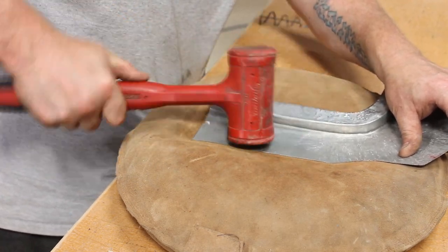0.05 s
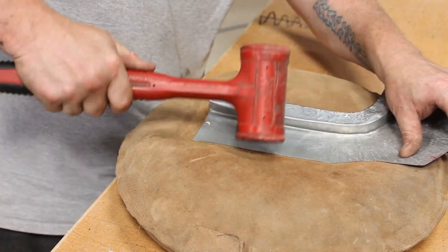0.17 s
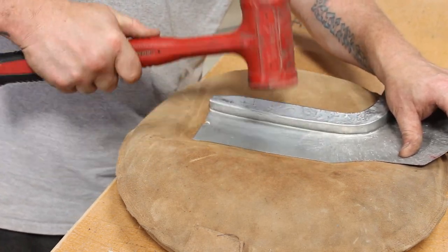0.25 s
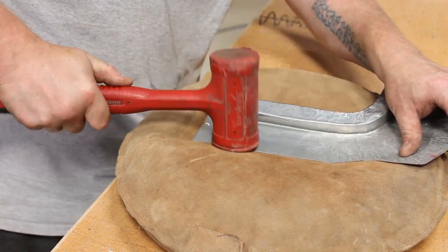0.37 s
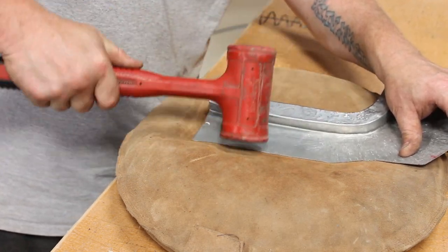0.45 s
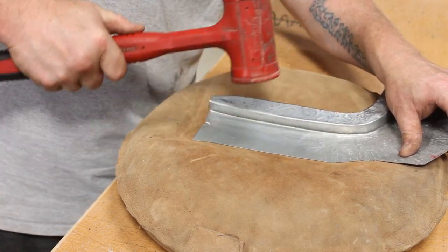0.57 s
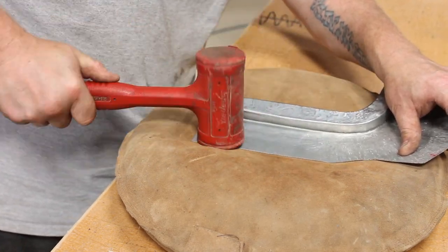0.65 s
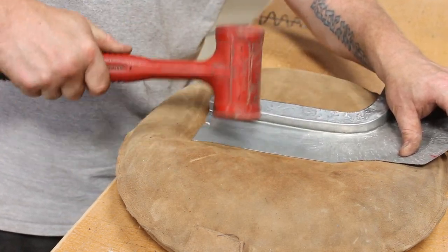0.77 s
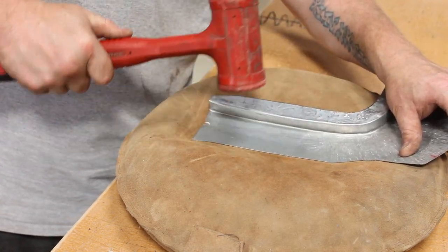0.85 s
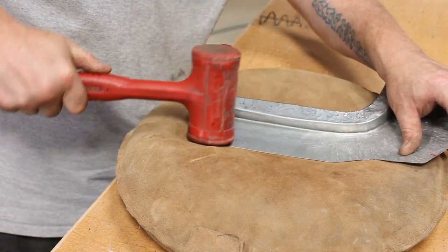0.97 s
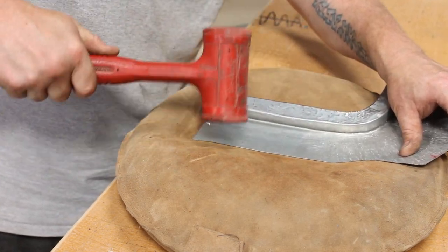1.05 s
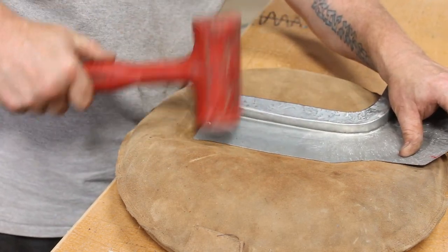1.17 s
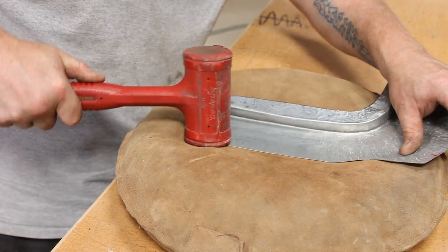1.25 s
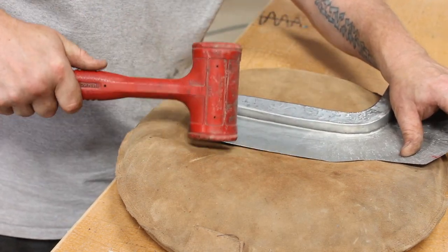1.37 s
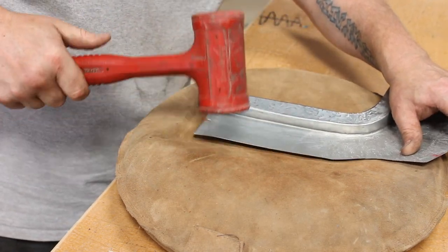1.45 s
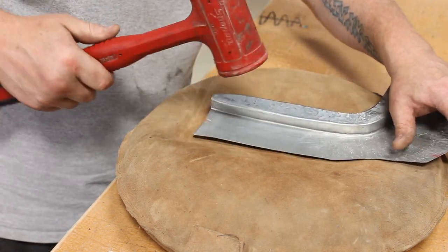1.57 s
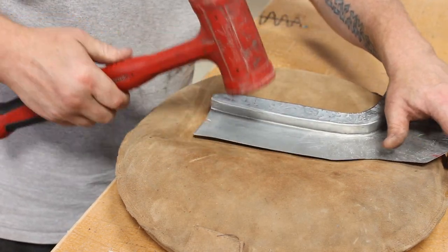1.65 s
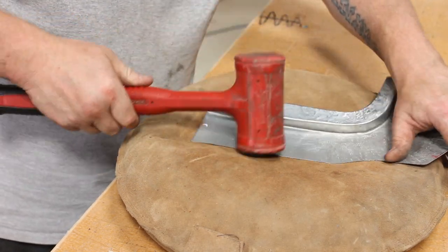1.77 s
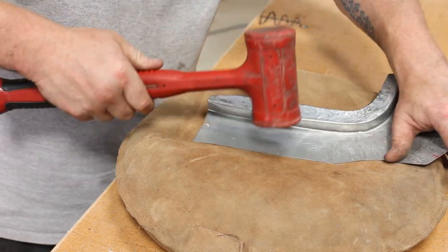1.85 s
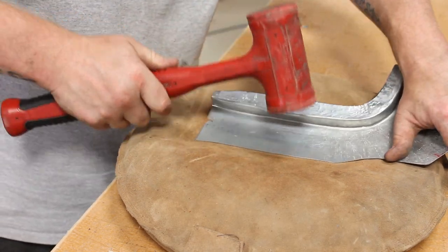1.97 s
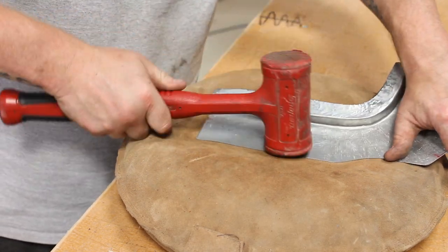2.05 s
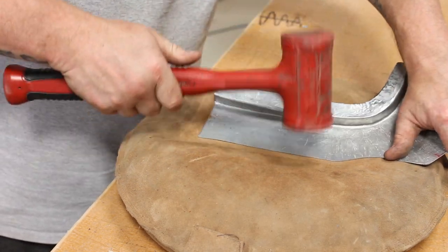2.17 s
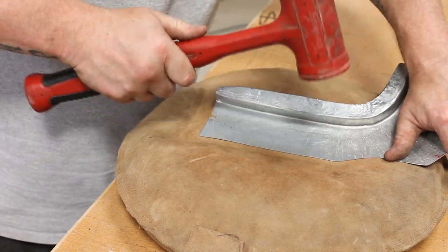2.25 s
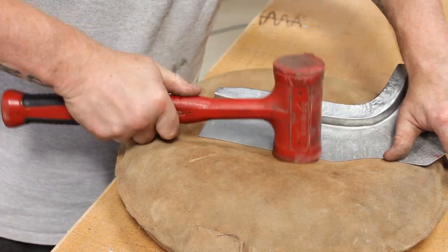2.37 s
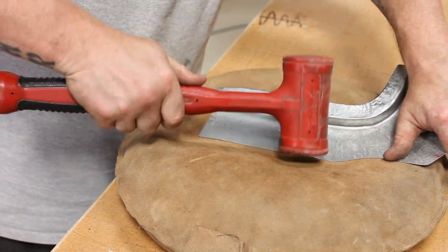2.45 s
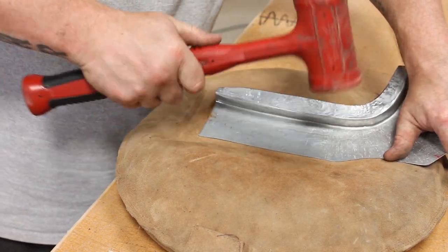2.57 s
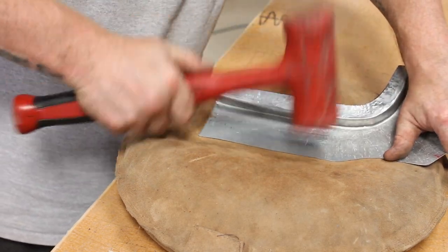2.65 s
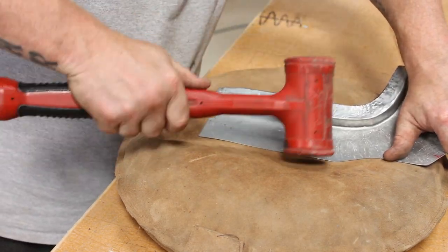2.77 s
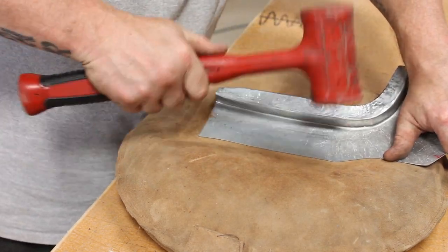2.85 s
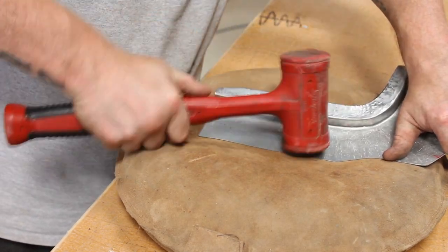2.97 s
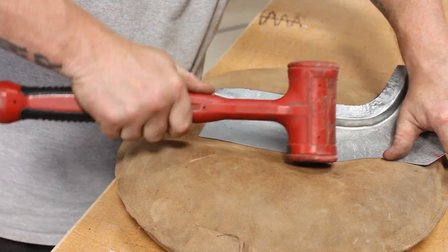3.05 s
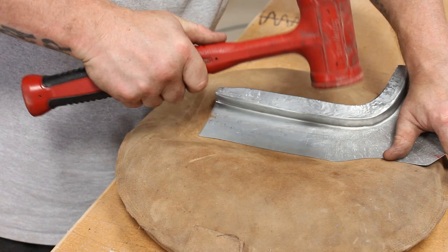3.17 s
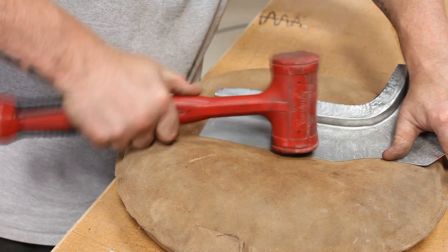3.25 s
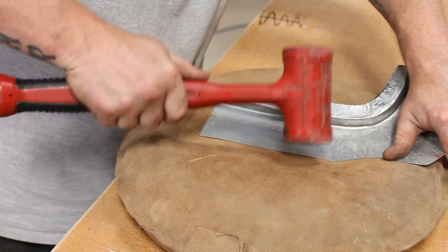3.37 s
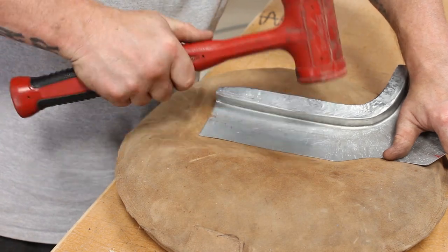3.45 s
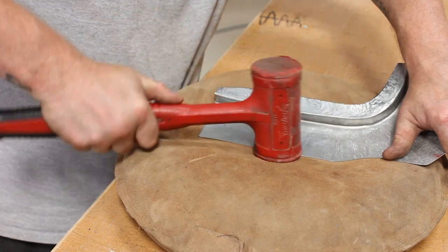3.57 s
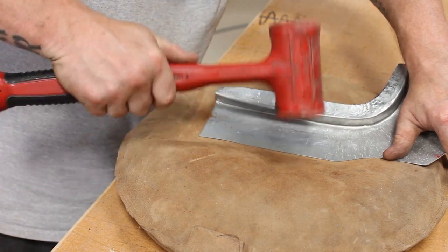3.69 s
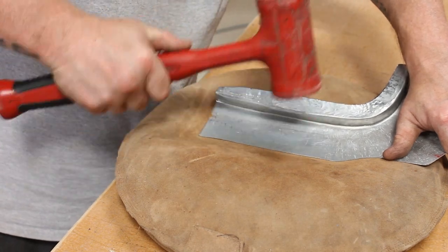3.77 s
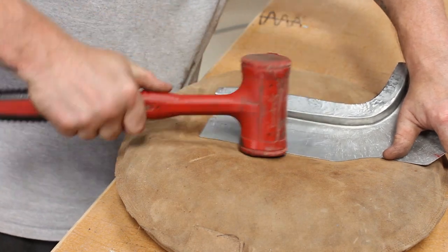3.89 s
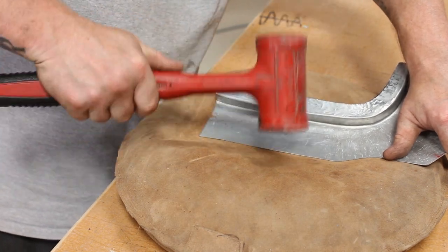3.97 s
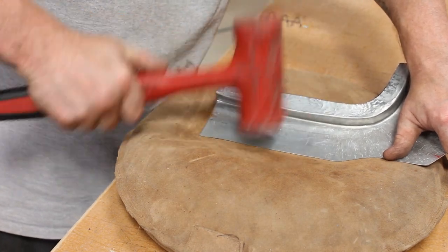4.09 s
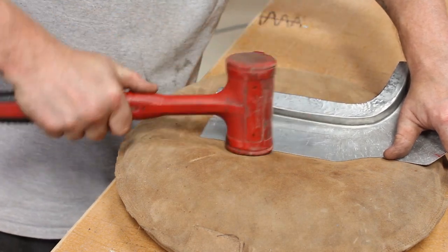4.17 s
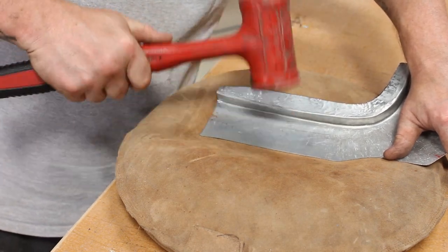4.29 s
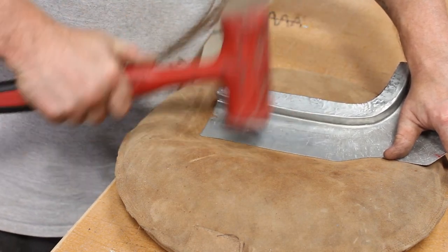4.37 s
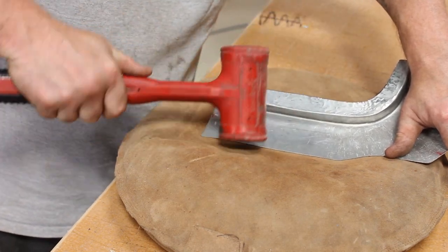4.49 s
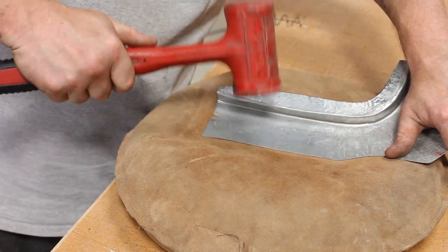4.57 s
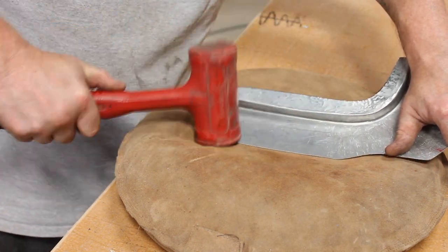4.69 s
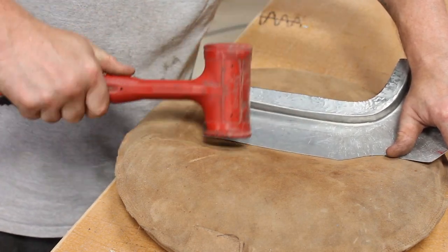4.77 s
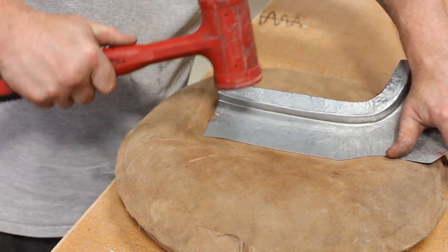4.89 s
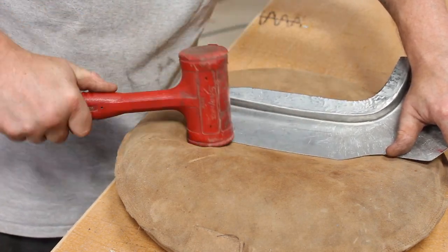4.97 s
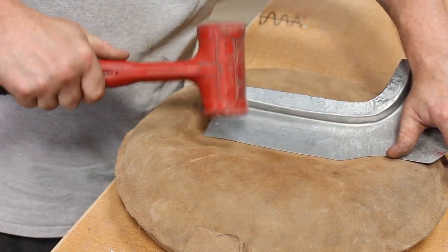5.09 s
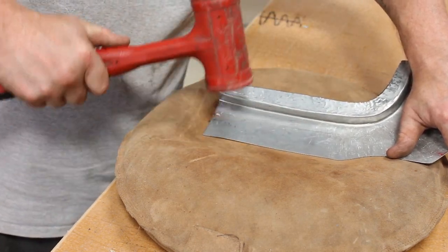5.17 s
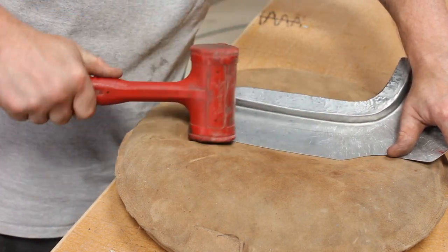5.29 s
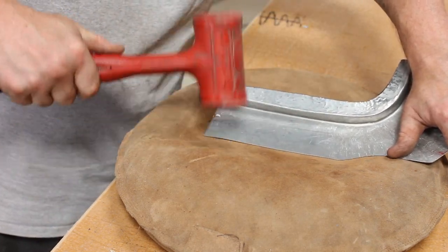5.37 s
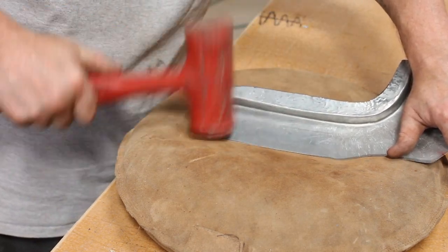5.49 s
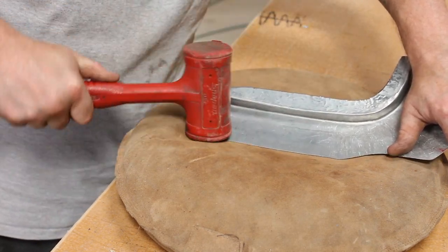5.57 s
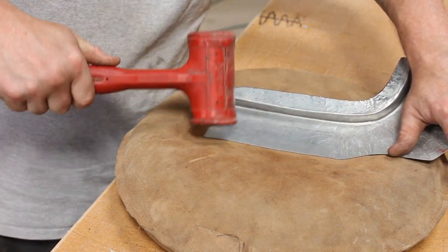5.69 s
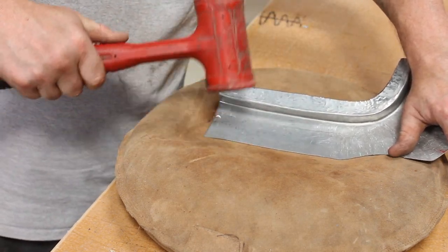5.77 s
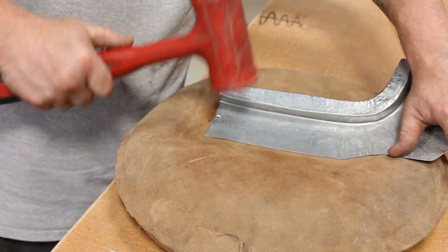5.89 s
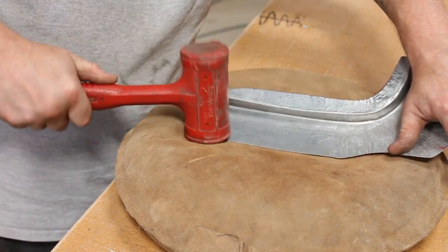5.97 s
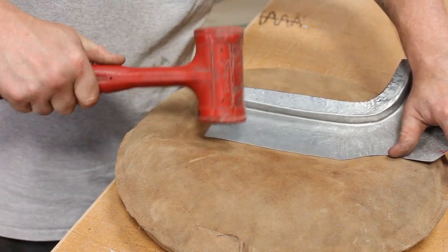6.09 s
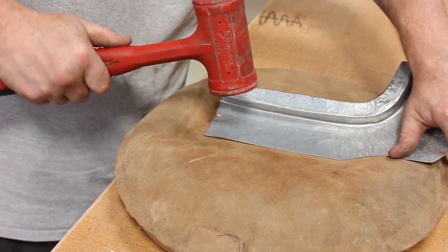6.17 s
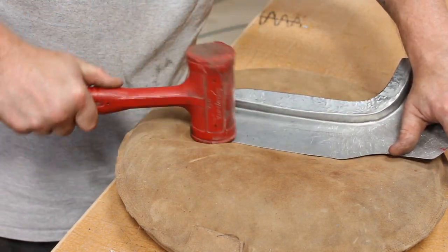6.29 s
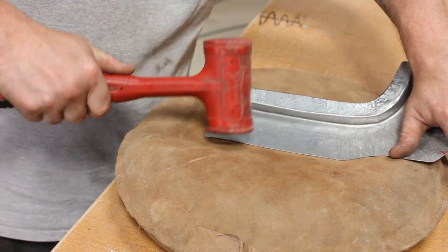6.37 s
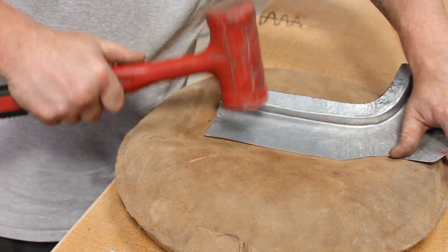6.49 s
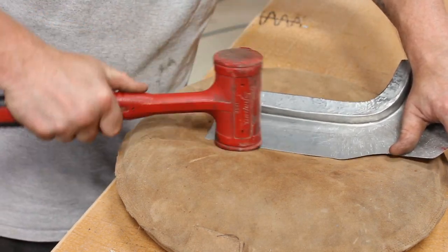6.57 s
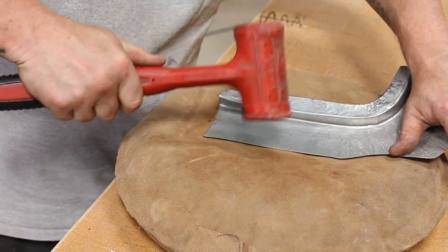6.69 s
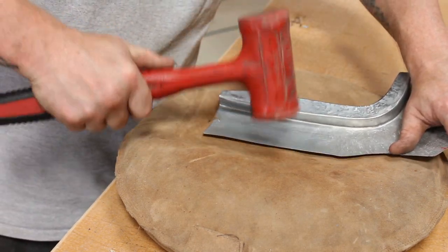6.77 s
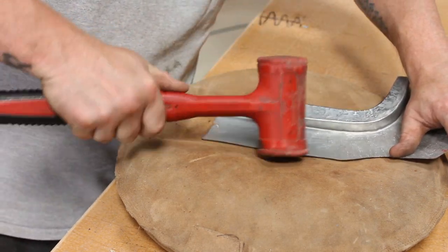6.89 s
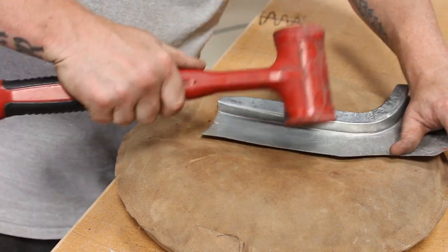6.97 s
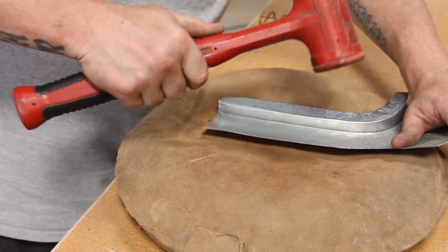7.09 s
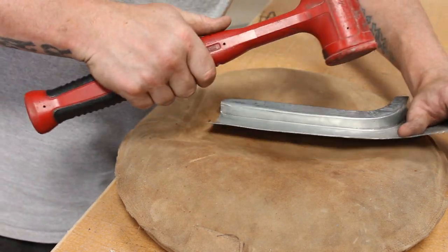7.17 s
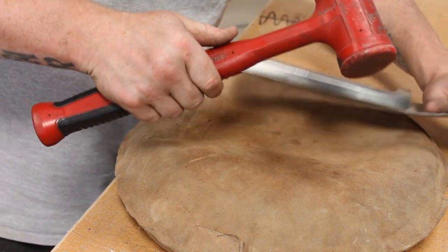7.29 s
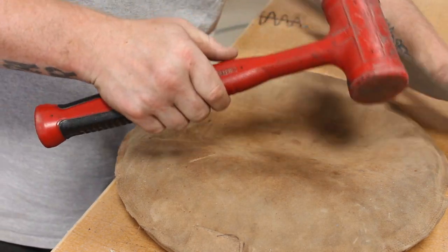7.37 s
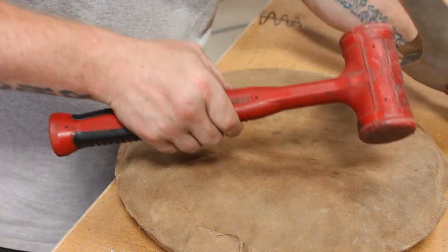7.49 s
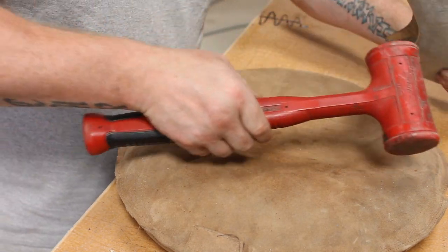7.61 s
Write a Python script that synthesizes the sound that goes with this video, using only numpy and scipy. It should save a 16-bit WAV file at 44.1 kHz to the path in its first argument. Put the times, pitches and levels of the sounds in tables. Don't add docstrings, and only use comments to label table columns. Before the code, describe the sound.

A dead-blow mallet beats a metal panel on a leather sandbag, about three or four blows a second. Each is a sharp flat slap with a very short metallic ring and a low bench thud. A weak glancing hit and a clangy edge hit come near two seconds with a scrape, then the loudest blows, gradually softening. After the last strike, reverb fades over faint hum. Close mono microphone, hard-walled workshop, slightly clipped.

```python
import sys
import numpy as np
from scipy import signal
from scipy.fft import rfft, irfft
from scipy.io import wavfile
from scipy.ndimage import uniform_filter1d

SR = 44100
rng = np.random.default_rng(int(sys.argv[2]) if len(sys.argv) > 2 else 0)


def transcribe(signal):
    frames = np.atleast_2d(signal).T
    limited = np.clip(frames, -1, 1)
    pcm = np.round(limited * 32767).astype(np.int16)
    wavfile.write(sys.argv[1], SR, pcm)


def magnitude_from_level(level_db):
    exponent = np.asarray(level_db, float) / 20
    return 10 ** exponent


N = 336923


def evened(x):
    return x / np.sqrt(np.mean(x ** 2) + 1e-20)


def read(points, hz, axis=1):
    table = np.transpose(points)
    return np.interp(np.log(hz + 1), np.log(table[0] + 1), table[axis])


def add(mix, s, sound):
    part = mix[round((s + 1) * SR):][:len(sound)]
    part += sound[:len(part)]


def resonate(x, hz, width_hz):
    return signal.lfilter(*signal.iirpeak(hz, hz / width_hz, fs=SR), x)


def ring(modes, detune=1., size=SR):
    t = np.arange(size) / SR
    total = np.zeros(size)
    for hz, db, t60, *sign in modes:
        total += np.prod(sign) * magnitude_from_level(db - 60 * t / t60) * np.sin(2 * np.pi * hz * detune * t)
    return total


def strengths(force_db, flat_db, grit_db):
    usual_force_db = -27
    rattle_db = usual_force_db + 0.9 * (force_db - usual_force_db) + 0.26 * flat_db
    low_db = force_db - 2.5 + flat_db
    mid_db = rattle_db - 11.5
    high_db = force_db - 29.5 + grit_db
    return force_db, low_db, mid_db, high_db


# (time [s], frequency [Hz], width [Hz], boost [dB])
EDGE_CLANGS = [
    (1.861, 1490, 300, 2.5),
    (1.861, 2300, 700, 7),
    (2.137, 2404, 320, 10),
    (2.137, 4150, 485, 9),
    (6.911, 3500, 600, 7),
    (6.913, 6520, 1094, 5),
]


def edge_stress(s, hz):
    boost_db = np.zeros(len(hz))
    for clang_s, centre_hz, width_hz, db in EDGE_CLANGS:
        if abs(clang_s - s) < .1:
            boost_db += db * np.exp(-((hz - centre_hz) / width_hz) ** 2)
    return boost_db


# (frequency [Hz], level [dB])
SLAP_COLOUR = [(60, -14.5), (200, -11), (400, 0.5), (800, 1.5), (1600, 5.5), (2000, 2), (3200, 5),
               (5000, 4), (9000, 8.5), (13000, -7), (17000, -30.5)]


def slap(noise, s, levels_db, patch_hz):
    t = np.arange(len(noise)) / SR
    hz = np.fft.rfftfreq(len(t), 1 / SR)
    push = 1.96 * (1 - t / 0.00048) * np.exp(-t / 0.00052)
    decay = np.exp(-t / 0.0022) + 0.065 * np.exp(-t / 0.0037)
    rattle = noise * decay * np.minimum(t / 0.00044, 1)
    patch = 2.18 * resonate(rattle, patch_hz, 0.59 * patch_hz)
    contact = rfft(push + rattle + patch)
    touch = 4.7 * rfft(np.diff(noise[::-1] * np.exp(-t / 0.00073), prepend=0))

    blow_colour = list(zip((250, 800, 3200, 9000), levels_db))
    colour_db = read(SLAP_COLOUR, hz) + read(blow_colour, hz) + edge_stress(s, hz)
    log_gain = np.log(magnitude_from_level(np.r_[colour_db, colour_db[-2:0:-1]]))
    causal = np.conj(np.exp(signal.hilbert(log_gain)))[:len(hz)]
    close = irfft((contact + touch) * causal)

    spectrum = rfft(rattle)
    smooth = spectrum / (abs(spectrum) + 1e-9) ** 0.85
    spread = np.roll(irfft(smooth * causal), 1024) * signal.windows.tukey(len(t), .4)
    return magnitude_from_level(24.5) * close, magnitude_from_level(46) * spread


# (frequency [Hz], level [dB], t60 [s])
PANEL_MODES = [(640, -6.5, 0.04), (965, -19.5, 0.18), (1220, -16.5, 0.027), (1530, -11, 0.16),
               (1647, -13.5, 0.2), (2306, -8, 0.047), (2780, -0.5, 0.018), (3550, -5, 0.016)]


def panel_ring(low_db, tune):
    return magnitude_from_level(low_db + 10.0) * ring(PANEL_MODES, 1 + 0.027 * tune, size=8000)


# (frequency [Hz], level [dB], t60 [s], first swing toward +1 or away -1)
BENCH_MODES = [(107, -10, .27, -1), (140, -19, .25, 1), (188.5, -1.5, .14, -1), (225, -6, .22, -1),
               (261.5, 0, .2, 1), (326, -12, .2, -1), (398, -8, .18, -1), (470, -14, .22, 1),
               (513, -13, .25, -1)]


def bench_thud():
    return ring(BENCH_MODES)


# (frequency [Hz], level [dB], t60 [s], first swing +1 or -1)
ROOM_MODES = [(57, -24, .6, -1), (92, -25, .6, 1), (160, -25, .7, 1), (184.5, -18, .7, -1),
              (193, -18, .5, -1), (230, -19, .45, 1), (248.5, -20, .7, 1), (254.3, -18, 1.2, 1),
              (261, -20, .55, 1), (386, -17, .3, 1), (430, -24, .8, 1), (466, -20, .45, 1),
              (494, -23, .6, 1), (510, -24, .75, -1)]


def standing_waves():
    t = np.arange(SR) / SR
    return np.array([ring([mode]) for mode in ROOM_MODES]) * (1 - np.exp(-t / 0.036))


# (time [s], force [dB], flat landing: extra slap near 800 Hz [dB],
# grit under the face: extra crack near 9 kHz [dB], panel patch pitch [Hz])
MALLET_BLOWS = [(-0.13, -24, 4.5, -1, 820), (0.1567, -21.5, 2.5, 2, 1390), (0.447, -23, 4.5, 1.5, 790),
                (0.733, -26, 3.5, 4, 850), (1.008, -29, .5, 3, 750), (1.2957, -26.5, -4, -1.5, 2650),
                (1.8604, -40, -0.5, -2.5, 2510), (2.1365, -31, -2, 2.5, 2060), (2.46, -14.5, -2, -3, 1140),
                (2.7805, -16.5, 2.5, 2, 1200), (3.073, -19, 1.5, 0, 900), (3.3586, -20.5, 1.5, -0.7, 2880),
                (3.6395, -20, .5, -1.5, 1200), (3.925, -22.5, 1.5, 2.5, 1530), (4.215, -24, 5, 2, 1550),
                (4.4952, -27, 2.5, 1, 2647), (4.775, -29.5, 0, -2, 2440), (5.0477, -29, -2.5, -3.5, 1530),
                (5.3216, -30.5, 0, -0.5, 1590), (5.6071, -26.5, -0.5, 0.5, 1490),
                (6.0416, -27, -2.5, 0.5, 1470), (6.347, -27.5, -5.5, -1.5, 530),
                (6.631, -26.5, -1.5, 0.5, 910), (6.911, -34, 0, 11.5, 3500)]


def blows():
    near, low, spread = np.zeros((3, N + SR))
    count = len(MALLET_BLOWS)
    noise = rng.standard_normal((count, 4096))
    chance = rng.uniform(-0.78, 1, (count, 2))
    uneven = magnitude_from_level(3.75 + 1.5 * rng.standard_normal((count, len(ROOM_MODES))))
    bench, waves = bench_thud(), standing_waves()
    for blow, z, (tune, lag), share in zip(MALLET_BLOWS, noise, chance, uneven):
        s, force_db, flat_db, grit_db, patch_hz = blow
        levels_db = strengths(force_db, flat_db, grit_db)
        thud_db, low_db = levels_db[:2]
        close, far = slap(z, s, levels_db, patch_hz)
        add(near, s, close)
        add(spread, s - 1024 / SR, far)
        add(near, s + 0.000931, panel_ring(low_db, tune))
        thud_s = s + .0037 + 0.00022 * lag
        add(low, thud_s, magnitude_from_level(thud_db + 8.0) * (bench + share @ waves))
    return near, low, spread


# (time [s], level [dB], start frequency [Hz], end frequency [Hz], t60 [s])
BAG_BUMPS = [
    (1.861, -26.5, 106, 92, 0.36),
    (1.875, -33, 67, 57.8, 0.86),
    (2.139, -12.5, 374, 306, 0.065),
    (2.14, -29.5, 91, 60, 0.2),
    (6.631, -27, 110, 91, 0.14),
    (6.913, -24.5, 108, 91, 0.21),
]


def bag_bumps():
    out = np.zeros(N + SR)
    t = np.arange(SR) / SR
    for s, db, start_hz, end_hz, t60 in BAG_BUMPS:
        hz = end_hz + (start_hz - end_hz) * np.exp(-t / 0.028)
        swell = magnitude_from_level(db - 60 * t / t60) * (1 - np.exp(-t / 0.0016))
        add(out, s, swell * np.sin(2 * np.pi * np.cumsum(hz) / SR))
    return out


# (time [s], level [dB])
DRAG_COURSE = [
    (1.7, -88),
    (1.776, -80.5),
    (1.906, -71.5),
    (2.006, -72),
    (2.088, -70.5),
    (2.244, -76.5),
    (2.45, -86),
]
# (frequency [Hz], width [Hz], level [dB])
DRAG_RESONANCES = [(2530, 830, 7), (3860, 300, -6), (5920, 400, -8), (7900, 500, -19), (9900, 620, -15.5),
                   (11500, 4000, -18)]


def drag():
    out = np.zeros(N + SR)
    s, db = np.transpose(DRAG_COURSE)
    t = np.arange(s[0], s[-1], 1 / SR)
    slip = rng.standard_normal(len(t))
    roughness_db = 1.0 * evened(uniform_filter1d(rng.standard_normal(len(t)), 300))
    grain = slip * magnitude_from_level(roughness_db)
    hiss = sum(magnitude_from_level(d) * evened(resonate(grain, f, w)) for f, w, d in DRAG_RESONANCES)
    hiss = signal.lfilter(*signal.butter(2, 13000, fs=SR), hiss)
    level = magnitude_from_level(np.interp(t, s, db) + 16.5) * signal.windows.tukey(len(t), .1)
    add(out, s[0], level * evened(hiss))
    return out


# (time [s], level [dB], length [s])
FINGER_TICKS = [
    (1.718, -61, 0.0015),
    (1.7246, -51, 0.0014),
    (1.733, -59, 0.0025),
    (1.757, -61.5, 0.0144),
    (1.864, -39, 0.0038),
    (7.283, -63, .004),
    (7.415, -74, .004),
    (7.497, -66.5, 0.017),
]


def ticks():
    out = np.zeros(N + SR)
    t = np.arange(4000) / SR
    bright = signal.butter(1, [1800, 10000], "band", fs=SR)
    for s, db, length in FINGER_TICKS:
        burst = signal.lfilter(*bright, rng.standard_normal(len(t)))
        add(out, s, magnitude_from_level(db + 4.0) * burst * np.exp(-t / length))
    return out


# (time [s], modes (frequency [Hz], level [dB], t60 [s]))
KNUCKLE_KNOCK = (7.494, [(1550, -55, 0.065), (1845, -61, .04)])


def knock():
    out = np.zeros(N + SR)
    s, modes = KNUCKLE_KNOCK
    add(out, s, ring(modes, size=8000))
    return out


# (delay [s], level [dB])
WALL_ECHOES = [
    (.0041, -11.5),
    (.0093, -20.5),
    (0.0155, -19),
    (0.0244, -18),
    (0.0292, -16),
    (.0362, -23),
]


def echoes(x):
    taps = np.zeros(2048)
    for s, db in WALL_ECHOES:
        taps[round(s * SR)] = magnitude_from_level(db)
    taps = signal.lfilter(*signal.butter(1, 2200, fs=SR), taps)
    return x + signal.oaconvolve(x, taps)[:len(x)]


# (frequency [Hz], level [dB], t60 [s])
ROOM_TAIL = [(60, 5, .7), (129, -5, .7), (162.5, 7, 1), (300, 2, 0.92), (512, 0.5, 1), (1200, -7.5, 0.96),
             (1560, -8.5, 0.92), (2140, -13, 1), (4300, -15, 1), (5100, -16, 0.9), (9250, -12, 0.48),
             (14200, -8, 0.38)]


def workshop(x):
    hz, t, z = signal.stft(rng.standard_normal(2 * SR), SR, nperseg=256)
    t60 = read(ROOM_TAIL, hz, axis=2)[:, None]
    slopes = magnitude_from_level(-60 * t / t60) + 0.5 * magnitude_from_level(-60 * t / (0.19 * t60))
    colour = magnitude_from_level(read(ROOM_TAIL, hz))[:, None]
    tail = signal.istft(z * slopes * colour, SR, nperseg=256)[1]
    build_up = np.clip((np.arange(len(tail)) / SR - .004) / 0.0068, 0, 1)
    tail *= magnitude_from_level(-34.0) * build_up
    return signal.fftconvolve(x, tail)[:len(x)]


# (frequency [Hz], width [Hz], level [dB])
DRONE_BANDS = [(532, 6.9, -72.5), (585, 5.2, -63.5), (860, 5, -78)]


def drone():
    drive = rng.standard_normal(N)
    return sum(magnitude_from_level(db) * evened(resonate(drive, hz, width_hz)) for hz, width_hz, db in DRONE_BANDS)


# (frequency [Hz], level [dB])
HUM_TONES = [(48.4, -56), (60, -65)]


def hum():
    t = np.arange(N) / SR
    return magnitude_from_level(2.0) * sum(magnitude_from_level(db) * np.sin(2 * np.pi * hz * t) for hz, db in HUM_TONES)


# (frequency [Hz], spectral density [dB per Hz])
AIR_COLOUR = [(18, -39), (35, -14), (55, -12), (85, -22.5), (250, -21), (450, -26), (600, -18),
              (800, -24.5), (1500, -29), (4900, -46), (9000, -43.5), (16000, -61.5)]


def shop_air():
    hz = np.fft.rfftfreq(N, 1 / SR)
    spectrum = rfft(rng.standard_normal(N)) * magnitude_from_level(read(AIR_COLOUR, hz))
    return magnitude_from_level(-63.0) * evened(irfft(spectrum, N))


def scene():
    near, low, spread = blows()
    low += bag_bumps()
    hands = drag() + ticks() + knock()
    room = echoes(near + hands) + low + workshop(spread + hands)
    mono = room[SR:] + shop_air() + hum() + drone()
    return np.array([mono, mono])


def ducked(x):
    threshold_db, share, recovery_db_per_s = -18, 0.32, 53.5
    power = signal.lfilter([.003], [1, -.997], x[0] ** 2)
    power_db = 10 * np.log10(power + 1e-12)
    fall = np.arange(N) * recovery_db_per_s / SR
    held_db = np.maximum.accumulate(power_db + fall) - fall
    over_db = np.maximum(held_db - threshold_db, 0)
    return x / magnitude_from_level(share * signal.lfilter([.002], [1, -.998], over_db))


def band_limit(x):
    return signal.sosfilt(signal.butter(12, 16810, fs=SR, output="sos"), x)


def record(dry):
    low_cut = signal.butter(2, 51, "high", fs=SR)
    ceiling = .322
    clipped = np.clip(signal.lfilter(*low_cut, ducked(dry)), -ceiling, ceiling)
    limited = signal.oaconvolve(clipped, signal.firwin(63, 16500, fs=SR)[None], "same")
    noise = magnitude_from_level(-91) * rng.standard_normal(N) * [[1], [-1]]
    offset = np.array([[.0004], [-.0016]])
    return band_limit(limited + noise + offset)


dry = scene()
out = record(dry)
transcribe(out)
```